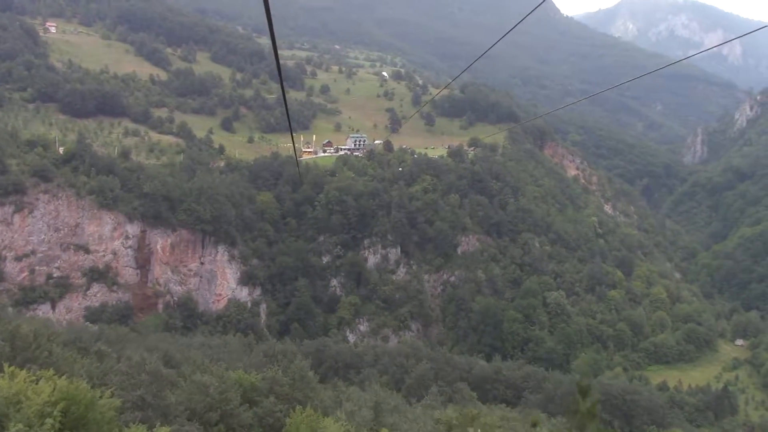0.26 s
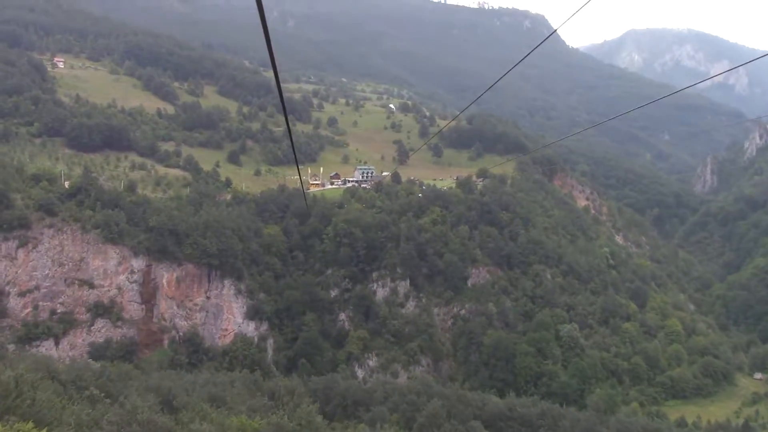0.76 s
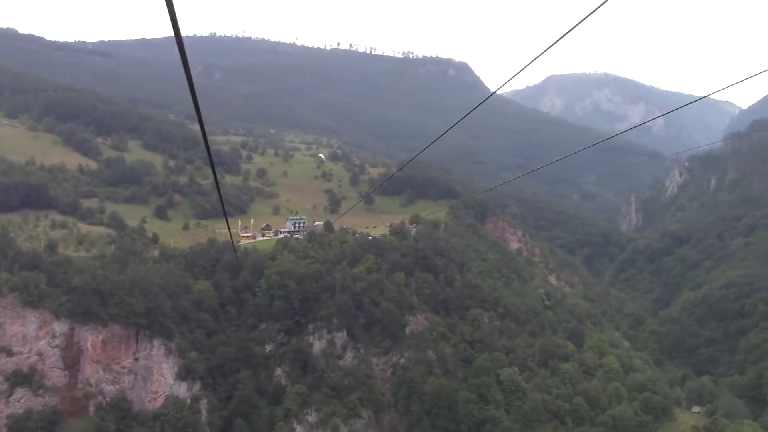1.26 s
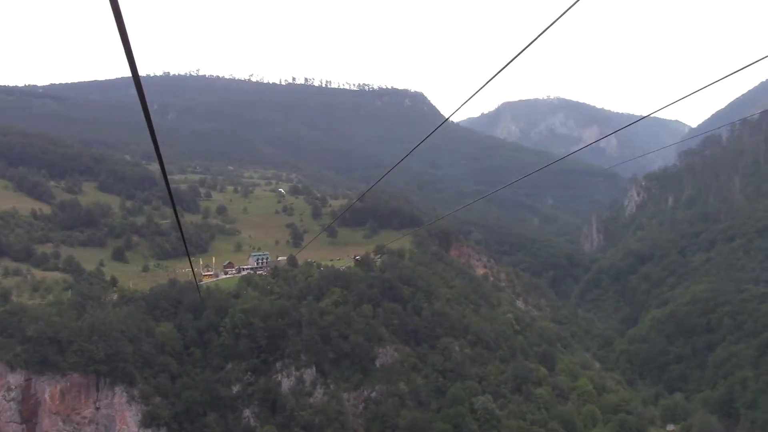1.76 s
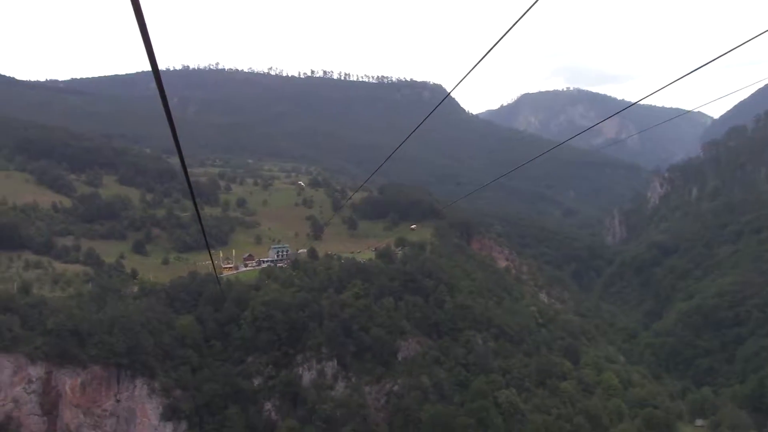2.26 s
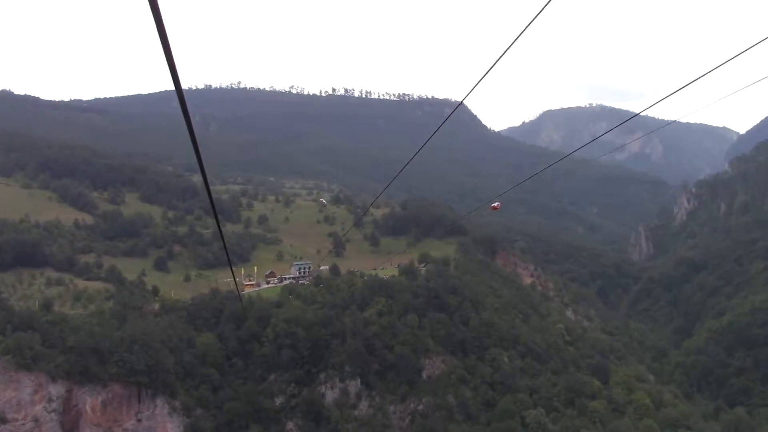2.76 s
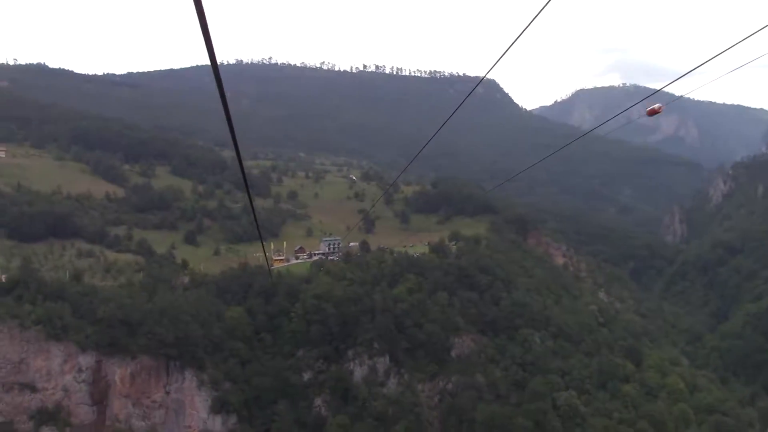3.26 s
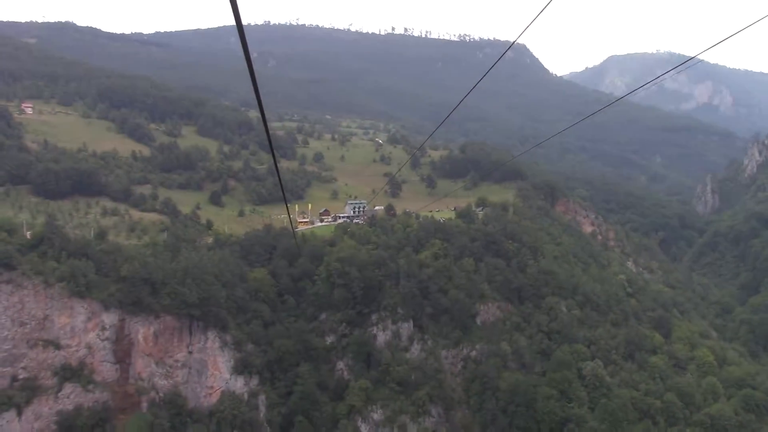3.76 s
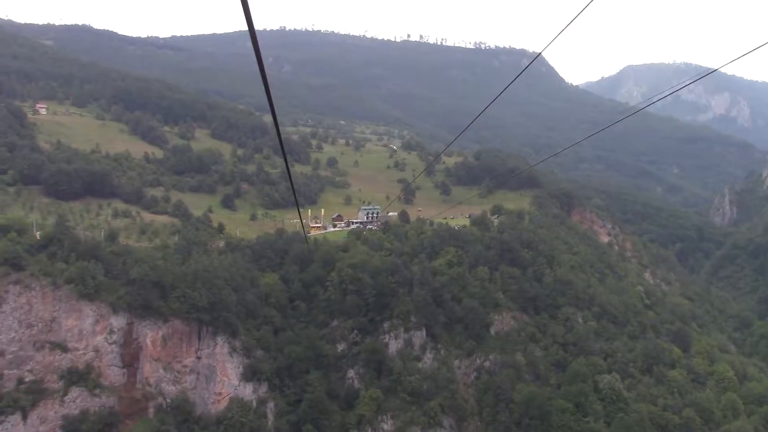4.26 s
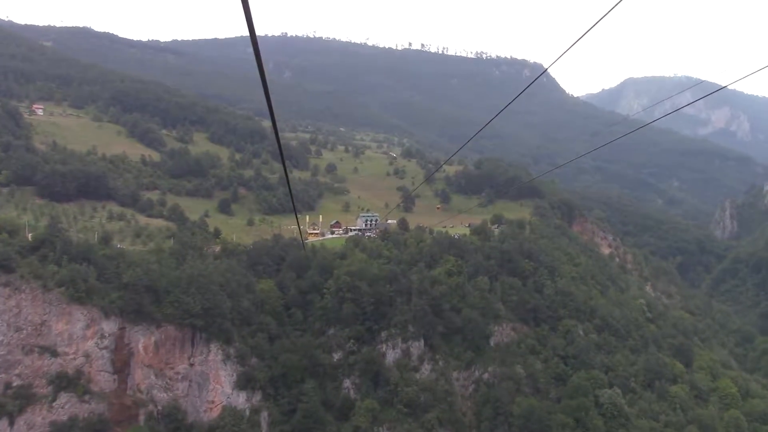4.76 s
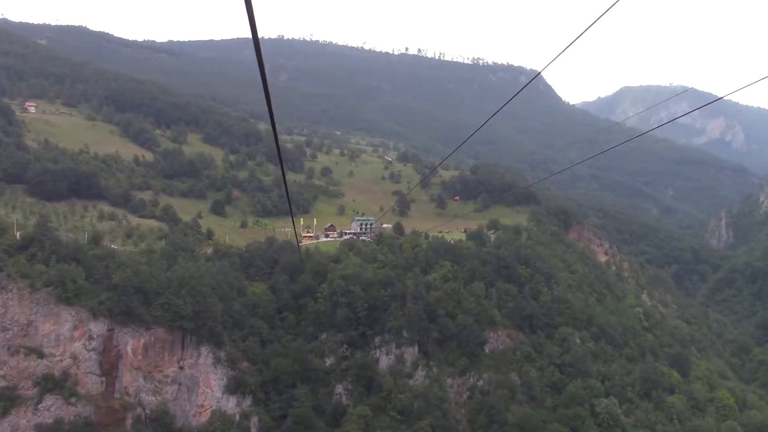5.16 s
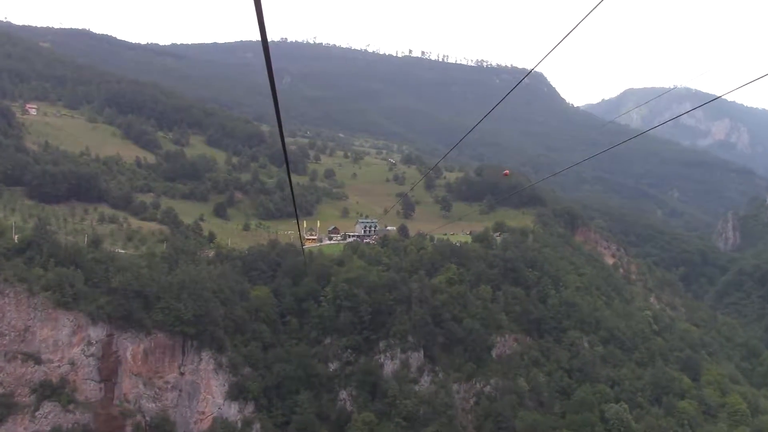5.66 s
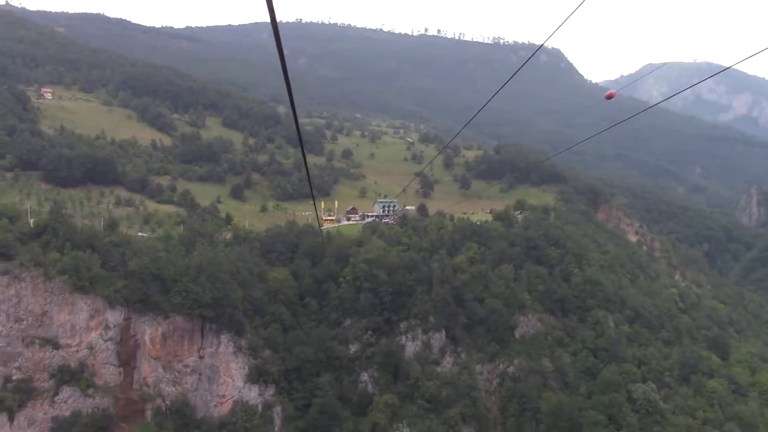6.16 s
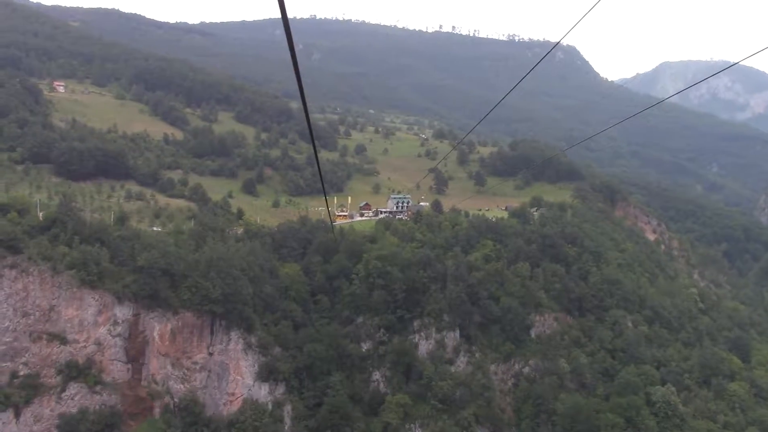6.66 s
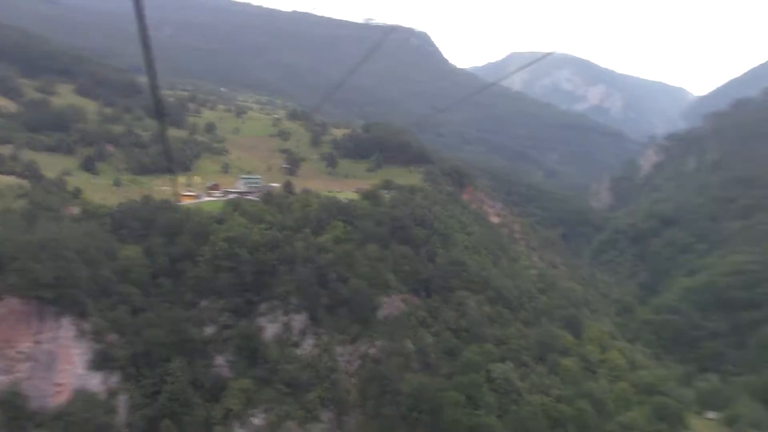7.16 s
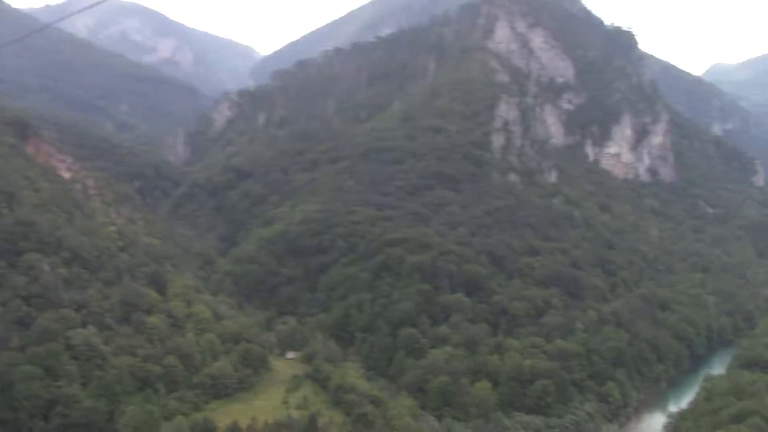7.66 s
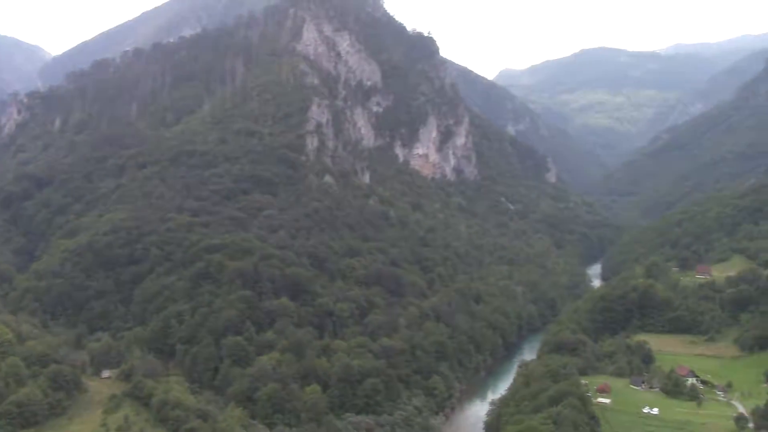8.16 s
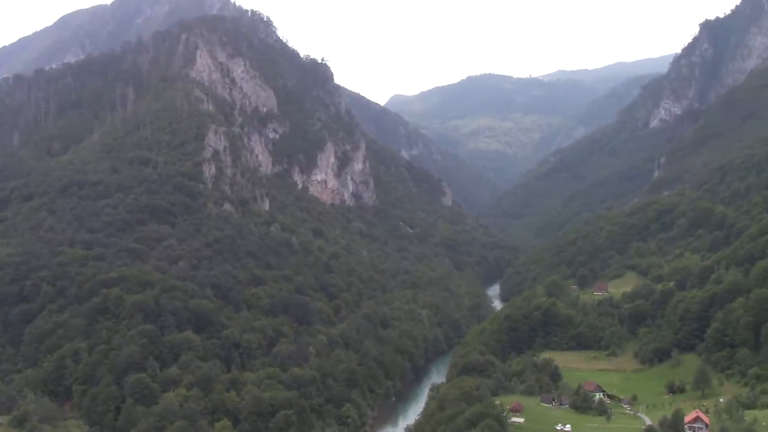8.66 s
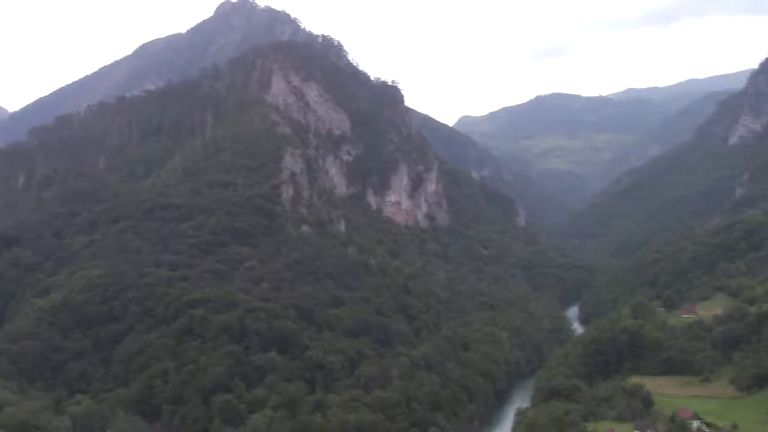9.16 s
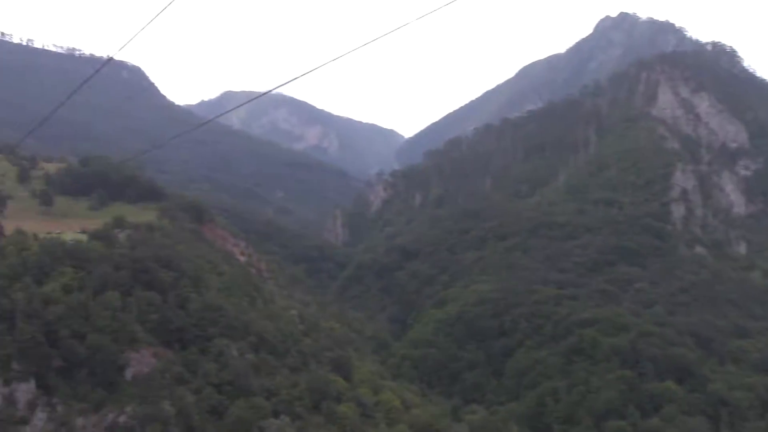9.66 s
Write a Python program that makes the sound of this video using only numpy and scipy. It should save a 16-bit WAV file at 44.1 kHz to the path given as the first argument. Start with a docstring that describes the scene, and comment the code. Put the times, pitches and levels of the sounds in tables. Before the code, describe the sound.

Steel wheels roll fast along a twisted cable, heard from the rider's position in open air. Ringing steel parts, a gliding high whine and bright sizzling hiss continue throughout, with an early rattle quickly dying away. Soft low wind buffeting grows underneath. Late on, turning the microphone brings a wide noisy blast of air with one short thin whistle, then the trolley sound partly returns.

```python
"""A rising whine over a rolling hiss: a rider's trolley gathers speed on a six-strand steel cable.
Tones locked to the passing strands, and noise, shake steel parts that ring at fixed pitches.
Under them are a low hum from the harness and filtered-noise wind rumble at the microphone ports.
Later a broad gust of patchy noise hits as the camera turns side-on, with one short whistle."""
import sys
import numpy as np
from scipy import signal
from scipy.fft import rfft, irfft, next_fast_len
from scipy.io import wavfile
from scipy.ndimage import uniform_filter1d

SR = 44100
rng = np.random.default_rng(int(sys.argv[2]) if len(sys.argv) > 2 else 0)


def digitize_waveform(pressure):
    """Quantize a signal to 16-bit integers and store it at the path in sys.argv[1].

    Rows of a 2-D input are taken as channels; values are limited to [-1, 1].
    """
    field = np.atleast_2d(pressure).T
    bounded = np.clip(field, -1, 1)
    quanta = np.round(bounded * 32767).astype(np.int16)
    wavfile.write(sys.argv[1], SR, quanta)


def amplitude_ratio(level_db):
    """Convert a level in decibels to the matching linear amplitude (field) ratio."""
    exponent = np.asarray(level_db, float) / 20
    return 10 ** exponent


N = 437031
FRAMES, HZ = N // 128 + 5, np.fft.rfftfreq(512, 1 / SR)  # short noise frames and their frequencies
T, FRAME_T = np.arange(N) / SR, np.arange(FRAMES) * 128 / SR  # seconds
WHEEL, BEARING, CAGE = .0556, .0932, .0745  # turns per strand passed


def evened(x):
    """Scales to an rms of one."""
    return x / np.sqrt(np.mean(x ** 2) + 1e-20)


def read(points, hz):
    """Reads a spectrum on a log-frequency axis."""
    f, value = np.transpose(points)
    return np.interp(np.log(hz + 1), np.log(f + 1), value)


def curves(rows, t):
    """Turns each column of a table into a curve over t."""
    s, *columns = np.transpose(rows)
    return [np.interp(t, s, c) for c in columns]


def coloured(x, points):
    """Filters by a spectrum in dB."""
    size = next_fast_len(N)
    gain = amplitude_ratio(read(points, np.fft.rfftfreq(size, 1 / SR)))
    return irfft(rfft(x, size) * gain, size)[..., :N]


def bump(hz, centre_hz, width_hz):
    """A resonance shape: one at its centre, half at half the width to either side."""
    return 1 / (1 + (2 * (hz - centre_hz) / width_hz) ** 2)


def ring(x, modes, bed, dips=()):
    """Filters by resonant peaks on a smooth bed, less narrow dips, with unit gain on white noise."""
    size = next_fast_len(N + SR)
    hz = np.arange(0, SR / 2, 2.)
    power = amplitude_ratio(read(bed, hz)) ** 2
    for centre_hz, width_hz, db in modes:
        power += amplitude_ratio(db) ** 2 * bump(hz, centre_hz, width_hz) ** 1.192
    for centre_hz, width_hz, db in dips:
        power *= amplitude_ratio(2 * db * bump(hz, centre_hz, width_hz))
    gain = np.interp(np.fft.rfftfreq(size, 1 / SR), hz, np.sqrt(power / power.mean()))
    return irfft(rfft(x, size) * gain, size)[..., :N]


def drift(width):
    """Slow chance of rms one, smoothed twice over a width in samples."""
    return evened(uniform_filter1d(uniform_filter1d(rng.standard_normal(N), width), width))


# strands passing under the wheel each second: (t/s, f/Hz)
STRAND_RATE = [(0, 695.8), (.3, 709.8), (.9, 730.5), (1.5, 753), (1.8, 765.5), (2.4, 781.5), (2.7, 794),
               (3.3, 812), (3.9, 827.5), (4.5, 845), (5.1, 856), (5.7, 869.2), (6.6, 883.3), (7.5, 894.8),
               (7.9, 897.5), (9.3, 904), (9.91, 905)]


def strand_rate():
    """The trolley's speed as strands per second."""
    return curves(STRAND_RATE, T)[0]


def strands_passed():
    """Counts the strands rolled over, at a very slightly unsteady speed."""
    return np.cumsum(strand_rate() * (1 + 0.00053 * drift(2000))) / SR


# the camera swings away from the trolley and back: (t/s, turned 0-1)
TURN = [(0, 0), (7.65, 0), (7.95, 0.9), (9.18, 0.8), (9.3, 0.32), (9.91, 0.03)]


def camera_turned():
    """How far the camera has swung away."""
    return curves(TURN, T)[0]


# levels of the rolling noise: (t/s, ringing frame level/dB, hiss level/dB before a 1.5 dB lift)
ROLL = [(0, -10, -22), (.25, -11, -21), (.45, -12, -24.5), (.8, -16.5, -25), (1.2, -13.5, -23.5),
        (1.65, -14.5, -22), (1.95, -16, -25), (2.4, -15, -24.2), (3, -13.5, -21.5), (3.6, -13.5, -22.5),
        (4, -13, -20.5), (5.1, -12.5, -20.5), (5.7, -14.5, -21.5), (6.5, -13, -20), (7.25, -15, -22),
        (7.58, -13.1, -21), (7.75, -17, -23.5), (8.1, -22, -29.5), (8.5, -27, -29.5), (9.1, -26.5, -26.5),
        (9.33, -23, -25.5), (9.91, -19, -19)]


def rolling_db():
    """Levels of the ringing frame and of the hiss."""
    return curves(ROLL, T)


def tone(strands, multiple, db):
    """A sine of the given rms level at a multiple of the strand rate, so it glides with the speed."""
    turns = (multiple * strands + rng.random()) % 1
    return np.sqrt(2) * amplitude_ratio(db) * np.sin(np.float32(2 * np.pi * turns))


def faint_tone(strands, multiple, db):
    """A weak tone that comes and goes by chance."""
    swells = amplitude_ratio(4.7 * rng.standard_normal(size=90))
    return tone(strands, multiple, db) * np.interp(T, np.linspace(0, T[-1], num=90), swells)


# These four tables give levels at 890 strands per second, before the tones come and go.
# uneven wheel: (wheel turns from the strand tone or octave, level/dB by the tone, level/dB by the octave)
WOBBLE = [(-2, -31.5, -39), (-1, -35, -31), (1, -33, -34.5)]
# tones of the cable twist, six strands a twist: (multiple of the twist rate, level/dB)
TWIST = [(4, -35.5), (8, -28.5), (9, -31.5), (10, -40), (14, -36), (15, -35), (16, -37), (18, -29.5),
         (22, -38), (24, -29), (28, -40), (30, -27)]
# tones one bearing turn above a multiple of the twist rate: (multiple, level/dB)
BESIDE = [(4, -45.5), (5, -51), (6, -24.5), (7, -44.5), (8, -25.5), (9, -38.5), (10, -50), (12, -34.5),
          (13, -47), (14, -46)]
# other faint tones, all at -30 dB: (multiple of the strand rate)
SINGING = [1.28, 1.38, 2.376]


def shaking_tones(strands):
    """Uneven wheels, bearings and cable twist shake the steel in step with the speed."""
    tones = np.zeros(N)
    for turns, tone_db, octave_db in WOBBLE:
        tones += faint_tone(strands, 1 + turns * WHEEL, tone_db)
        tones += faint_tone(strands, 2 + turns * WHEEL, octave_db)
    for multiple, db in TWIST:
        tones += faint_tone(strands, multiple / 6, db)
    for multiple, db in BESIDE:
        tones += faint_tone(strands, multiple / 6 + BEARING, db)
    for multiple in SINGING:
        tones += faint_tone(strands, multiple, -30)
    return tones * (strand_rate() / 890) ** 3.2  # unevenness shakes harder with speed


def throbbing_db(strands):
    """A rise and fall in dB locked to the bearing, its cage and the cable twist, plus chance."""
    steady = tone(strands, BEARING, -9.0) + tone(strands, CAGE, -5.0) + tone(strands, 1 / 3, -1.1)
    return steady + .5 * drift(150) + .5 * drift(1200)


# ringing of the frame, relative levels: (f/Hz, width/Hz, level/dB)
FRAME = [(845, 8.2, -17.5), (1011, 32, -11), (1082, 30, -6), (1127.3, 23.6, 4), (1155, 28, -9),
         (1291, 33, -12), (1440, 40, -12.5), (1455.5, 26, 0), (1428, 54, -6), (1523, 23, 2.5),
         (1548, 28, 0.5), (1665, 16, -41), (1700, 18, -30)]
# smooth response under the frame's peaks: (f/Hz, relative level/dB)
RING_BED = [(300, -70), (700, -60), (800, -50), (1000, -42), (1600, -44), (1750, -48), (2300, -56),
            (4000, -81)]
# neighbouring modes cancel; a positive change lifts instead: (f/Hz, width/Hz, change/dB)
DIPS = [(860, 98, 1.5), (1200, 26, 2), (1344, 35, 0.5), (1607, 56, -15)]


def frame(shaking):
    """The shaken steel frame rings at its own fixed pitches."""
    return ring(amplitude_ratio(rolling_db()[0]) * shaking, FRAME, RING_BED, DIPS)


# ringing pitches of the side plates: (f/Hz)
CHEEK_HZ = [1935, 2085, 2390, 2434, 2595, 2674, 2934, 3488]
# one row for each of those pitches: (width/Hz, relative level/dB)
CHEEKS = [(35.3, 3), (60, -1), (25, 1), (25, -4), (53, -2), (34.5, 2.5), (41, 3), (26, 4)]
# smooth response under the side plates' peaks: (f/Hz, relative level/dB)
CHEEK_BED = [(1200, -41), (1800, -7), (2280, -5.5), (2520, -4.5), (2800, -8), (3200, -4), (3700, -8),
             (4500, -63)]
# ring of one rattling side plate: (f/Hz, width/Hz, relative level/dB)
RATTLE = [(2934, 37, 0), (2960, 160, -10)]


def side_plates(shaking, throb_db):
    """The side plates ring and throb a little; one plate also rattles, harder at first."""
    level_db = rolling_db()[1] - 4 + 6 * camera_turned()
    plates = ring(amplitude_ratio(level_db + 0.5 * throb_db) * shaking, np.c_[CHEEK_HZ, CHEEKS], CHEEK_BED)
    rattle = amplitude_ratio(-23.5 - 17 * T + throb_db) * rng.standard_normal(N)  # fades by 17 dB per second
    return plates + ring(rattle, RATTLE, [(2000, -40), (4000, -46)])


# higher ringing pitches, heard in the hiss: (f/Hz)
PLATE_HZ = [3840, 4039, 4431, 4657, 5350, 5720, 6300, 6810, 7514, 7740, 8570, 13700]
# one row for each of those pitches: (width/Hz, relative level/dB)
PLATES = [(54, -3), (26, 0), (18, -27), (80, -1.5), (352, 0), (149, -10), (200, -8.5), (400, -3.5),
          (35, -6.5), (130, -4), (33, -10.5), (500, -24.5)]
# smooth response under the hiss peaks: (f/Hz, relative level/dB)
HISS_BED = [(3000, -26), (3700, -8.5), (4200, -6.5), (5900, -9), (7400, -7), (8100, -14.5), (10000, -22),
            (12500, -32.5), (14300, -54), (15000, -60)]
# later colour of the hiss: (f/Hz, change/dB)
SHADE = [(4600, 0), (5200, -4), (6200, -3), (7000, 0), (7600, 3), (8500, 1), (12000, -1)]


def hiss(shaking, throb_db):
    """Rolling noise rings the steel at high pitches, throbs with the bearings and changes colour late."""
    sound = amplitude_ratio(rolling_db()[1] + 1.5 + throb_db) * shaking
    sound = ring(sound, np.c_[PLATE_HZ, PLATES], HISS_BED)
    shaded = np.clip((T - 6.92) / .35, 0, 1)  # start and time taken, in seconds
    return (1 - shaded) * sound + shaded * coloured(sound, SHADE)


# ringing pitches that the strand tone and its octave cross: (f/Hz, width/Hz, level/dB at the crossing)
CROSSED = [(841.3, 21, -21), (892, 26, -32.5), (905, 6, -34.5), (1422, 27, -12), (1442.5, 38, -8.5),
           (1518, 9, -13.5), (1529.7, 24, -7), (1604, 27, -25), (1650, 13, -28), (1714, 11, -27.5)]
# pitches where the frame hardly answers: (f/Hz, width/Hz, change/dB)
CANCELLED = [(727, 22, -9), (1495, 21, -10)]


def crossing(hz, away_db):
    """Level in dB of a gliding tone that swells at ringing pitches and fades where they cancel."""
    power = amplitude_ratio(away_db) ** 2
    for centre_hz, width_hz, db in CROSSED:
        power = power + amplitude_ratio(db) ** 2 * bump(hz, centre_hz, width_hz) ** 2
    return 10 * np.log10(power) + sum(db * bump(hz, f, width_hz) for f, width_hz, db in CANCELLED)


# side tones, levels at a strand rate of 893 Hz: (wheel turns above the strand tone, level/dB)
STEADY = [(2, -30), (3, -32), (4, -28)]


def whine(strands):
    """Passing strands sing at their own rate, its octave and third multiple, with wheel side tones."""
    rate, turned = strand_rate(), camera_turned()
    # both are weaker once the camera has turned
    tone_db = crossing(rate, -33.5) - 8 * turned
    octave_db = crossing(2 * rate, -31) - 13 * turned
    sound = tone(strands, 1, tone_db + 1.26 * drift(1500))
    sound += tone(strands, 2, octave_db + 0.8 * drift(1500))
    sound += tone(strands, 3, -36 - 3 * T + 3 * drift(1500))  # fades by 3 dB per second
    near = bump(rate, 893, 56)  # the side tones grow as the strand rate nears this speed
    for turns, db in STEADY:
        sound += near * tone(strands, 1 + turns * WHEEL, db - turned + 1.5 * drift(1500))
    return sound


# side signal of the trolley's reflections: (f/Hz, gain/dB)
TROLLEY_SIDE = [(600, -87), (1000, -61), (1130, -33), (1300, -27), (1480, -22.5), (1900, -80), (2500, -18),
                (4500, -20), (6000, -37), (7700, -15.5), (10000, -23), (14000, -40)]


def widened(mid):
    """A short smear of reflections off the rider reaches the left and right ports unequally."""
    smear = evened(rng.standard_normal(400)) / np.sqrt(400)
    side = coloured(signal.oaconvolve(mid, smear)[:N], TROLLEY_SIDE)
    return np.array([mid + side, mid - side])


# level of the rumble, which also scales the hum: (t/s, level/dB)
RUMBLE_DB = [(0, -45), (1, -41.5), (3, -40.5), (4.2, -34), (4.6, -36.5), (6.5, -36), (7.8, -33),
             (8.2, -29.5), (8.6, -53), (9.91, -43)]


def low_level():
    """The level, as a plain factor, that the harness hum and the wind rumble share."""
    return amplitude_ratio(curves(RUMBLE_DB, T)[0])


def hum(strands):
    """The twist of the cable makes the harness hum, a fuzzy low note that climbs with the speed."""
    fuzz = evened(uniform_filter1d(rng.standard_normal(N), 900))
    note = (1.18 + fuzz) * tone(strands, .155, -7.5)
    return low_level() * (note + faint_tone(strands, 1 / 3 + BEARING, -14.5))


def trolley():
    """Tones locked to the speed and rolling noise shake the steel parts; whine and hum join them."""
    strands = strands_passed()
    throb_db = throbbing_db(strands)
    # each part has its own noise but shares the tones
    shaking = rng.standard_normal((3, N)) + shaking_tones(strands)
    steel = frame(shaking[0]) + side_plates(shaking[1], throb_db) + hiss(shaking[2], throb_db)
    leaning = amplitude_ratio([[.26], [-.26]])  # a touch louder on the left
    return widened(steel + whine(strands)) * leaning + hum(strands)


def ports(gain, same, patchy_db):
    """Patchy noise at two microphone ports, partly alike (same: 0-1)."""
    a, b, c, d, patches = rng.standard_normal((FRAMES, 257, 5)).T
    patches = uniform_filter1d(patches, size=14, axis=0)  # across frequency
    patches = evened(uniform_filter1d(patches, size=10, axis=1))  # across time
    flicker = evened(uniform_filter1d(rng.standard_normal(FRAMES), size=6))
    same = np.clip(same, 0, 1)
    mid, side = np.sqrt(1 + same) * (a + 1j * b), np.sqrt(1 - same) * (c + 1j * d)
    z = np.array([mid + side, mid - side]) * amplitude_ratio(patchy_db * (patches + flicker))
    return signal.istft(z * gain, nperseg=512, noverlap=384)[1][:, :N]


# colour of the wind rumble: (f/Hz, relative level/dB)
RUMBLE = [(15, -57), (25, -31), (43, -33), (88, -8), (200, -6.5), (358, -12), (448, -14), (700, -39),
          (910, -56), (1540, -120)]


def rumble():
    """Low eddies shed at the ports all the way down, made from low-coloured noise."""
    sound = coloured(ports(1, same=0.71, patchy_db=-0.6), RUMBLE)
    return low_level() * evened(sound)


# strength of the gust: (t/s, relative level/dB)
GUST = [(7.2, -80), (7.3, -33), (7.45, -40), (7.47, -27.5), (7.7, -23.5), (7.71, -15.5), (7.76, -18.5),
        (8.39, -18), (8.58, -21), (8.88, -22), (8.92, -23), (9.07, -22.5), (9.28, -23.5), (9.31, -33),
        (9.42, -31), (9.5, -26.5), (9.64, -29.5), (9.71, -33), (9.73, -48), (9.91, -54)]
# colour of the gust before its changing slope: (f/Hz, relative level/dB)
GUST_COLOUR = [(30, -45), (100, -27), (160, -16), (250, -3.5), (400, 0.5), (700, 2.5), (1500, 2.5),
               (2200, 2.5), (3500, 5), (5000, 4), (7000, -0.5), (10000, -8.5), (14000, -17), (15300, -50)]
# how alike the two ports sound: (f/Hz, likeness 0-1)
GUST_SAME = [(100, 0), (400, 0.34), (1500, 0.34), (6000, 0.86)]


def gust():
    """A broad rush of noise that brightens as the ports turn into the air stream."""
    # treble slope eases from -14.5 towards -1.5 dB per octave, from 7.36 s on
    slope_db = -1.5 - 13 * np.exp(-np.maximum(FRAME_T - 7.36, 0) / 0.73)
    octaves = np.log2(np.maximum(HZ, 150) / 700)[:, None]
    octaves = np.where(octaves > 0, octaves, 0.39 * octaves)  # gentler slope below 700 Hz
    level_db = curves(GUST, FRAME_T)[0] - 12.0
    gain = amplitude_ratio(level_db + read(GUST_COLOUR, HZ)[:, None] + slope_db * octaves)
    rush = ports(gain, same=read(GUST_SAME, HZ)[:, None], patchy_db=0.99)
    return rush * amplitude_ratio([[-.3], [.3]])  # a touch louder on the right


def whistle():
    """A port edge whistles once in the gust: a wavering sine, rising in pitch, mostly on the left."""
    start_s, length_s, start_hz, hz_per_s = 8.15, .13, 3015, 450
    since = T - start_s
    arch = np.sin(np.pi * np.clip(since / length_s, 0, 1))
    waver = 1 + .5 * evened(uniform_filter1d(rng.standard_normal(N), 500))
    sine = np.sin(2 * np.pi * since * (start_hz + hz_per_s * since / 2))
    return amplitude_ratio(-24.5) * arch * waver * sine * np.array([[1], [.2]])


def scene():
    """Trolley and rumble, then the gust and its whistle."""
    return trolley() + rumble() + gust() + whistle()


def low_pass(x):
    """Removes everything above the highest recorded frequency."""
    return signal.sosfilt(signal.butter(12, 15200, fs=SR, output="sos"), x)


def record(dry):
    """Microphone bass roll-off, late thinning of bass and width, and soft overload."""
    middle_and_side = np.array([dry[0] + dry[1], dry[0] - dry[1]]) / 2
    hz, t, z = signal.stft(middle_and_side, SR, nperseg=2048)
    # late in the gust the bass edge climbs and the low range narrows to the middle
    bass_hz = 56.3 + 133 * np.maximum(t - 7.96, 0)
    narrow_hz = 3400 * np.clip((t - 8.3) / 0.2, 0, 1) ** 2
    z *= 1 / np.sqrt(1 + (bass_hz / (hz[:, None] + 1)) ** 6)
    z[1] *= 1 / np.sqrt(1 + (narrow_hz / (hz[:, None] + 1)) ** 8)
    mid, side = signal.istft(z, SR, nperseg=2048)[1][:, :N]
    mix = 1.03 * np.tanh(np.array([mid + side, mid - side]) / 1.03)
    return low_pass(mix)


dry = scene()
out = record(dry)
digitize_waveform(out)
```